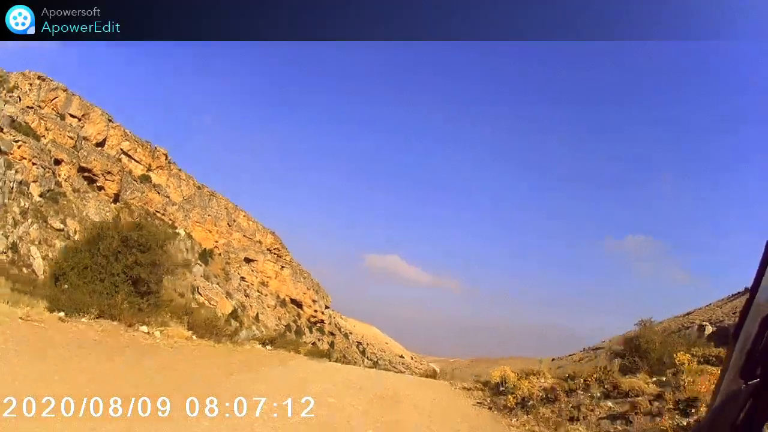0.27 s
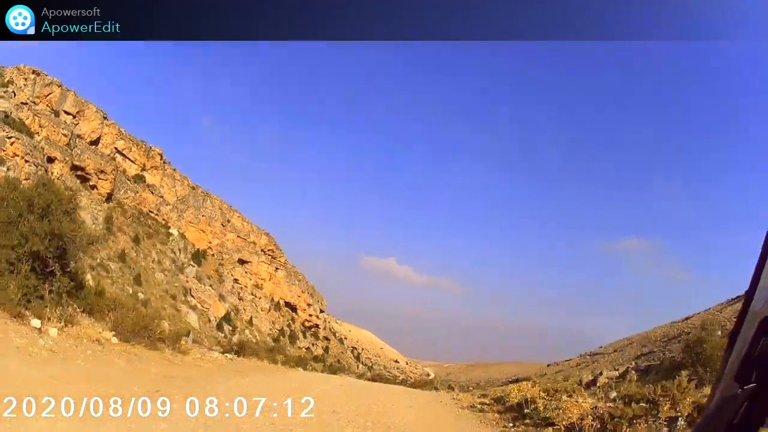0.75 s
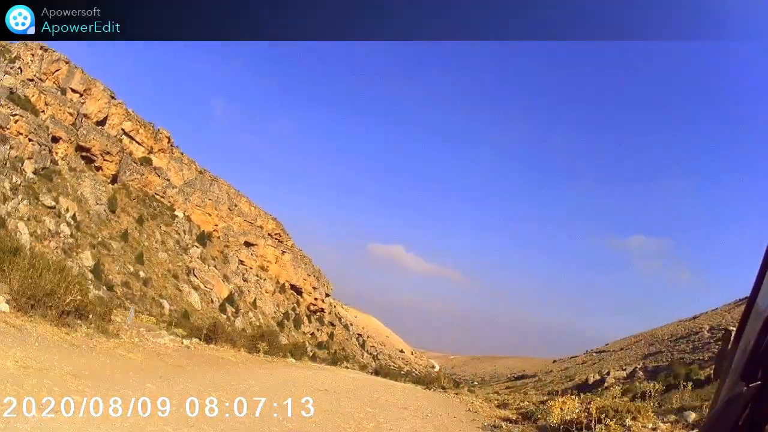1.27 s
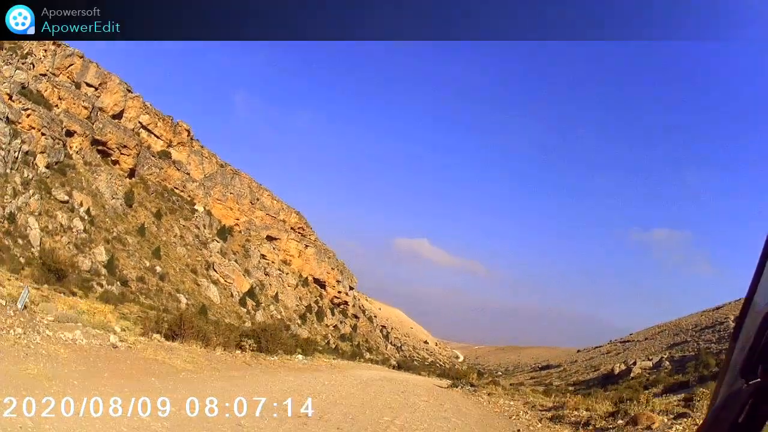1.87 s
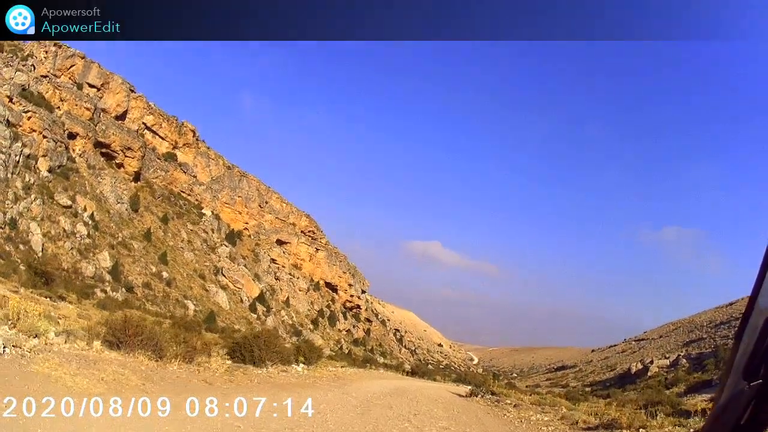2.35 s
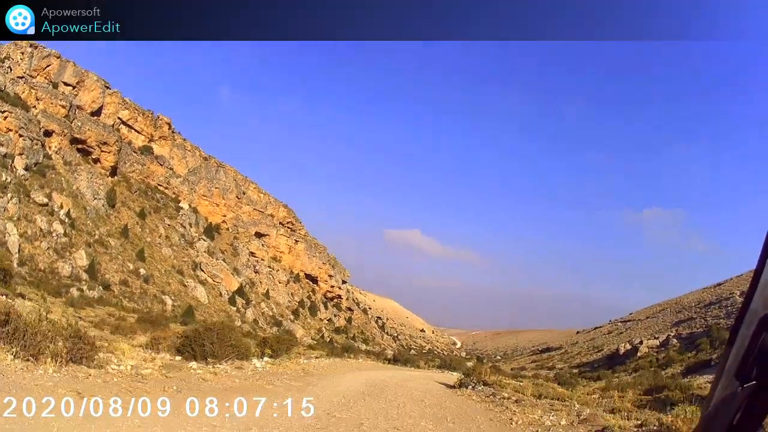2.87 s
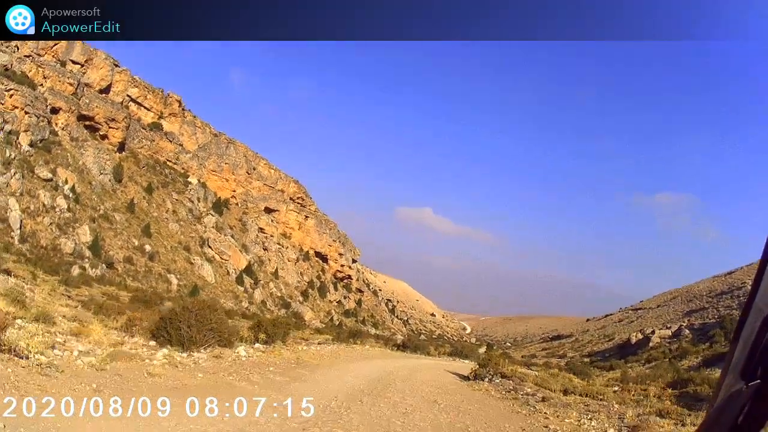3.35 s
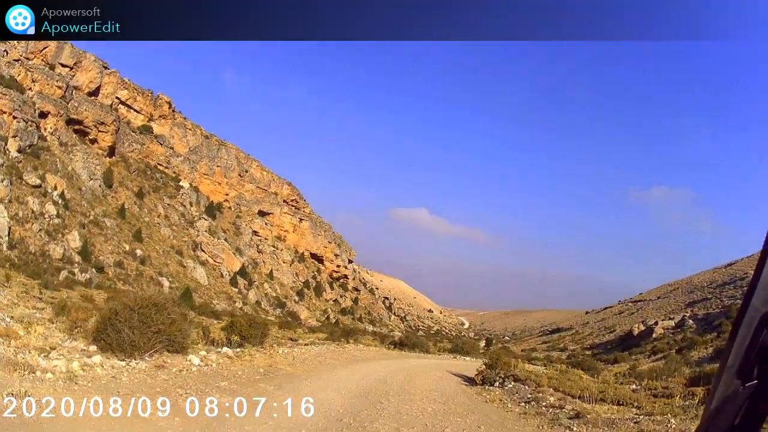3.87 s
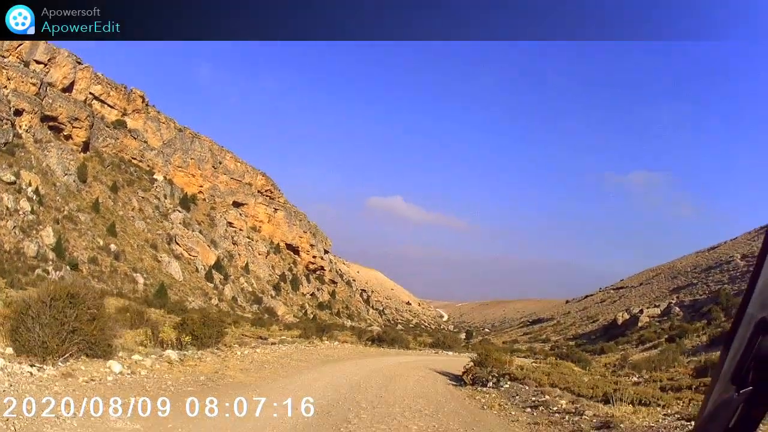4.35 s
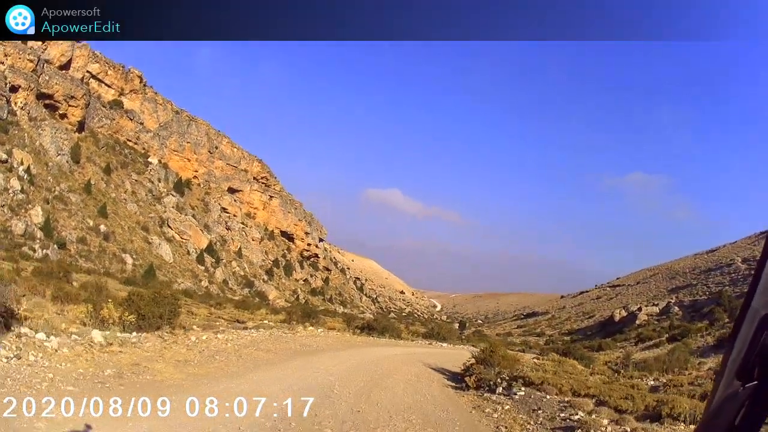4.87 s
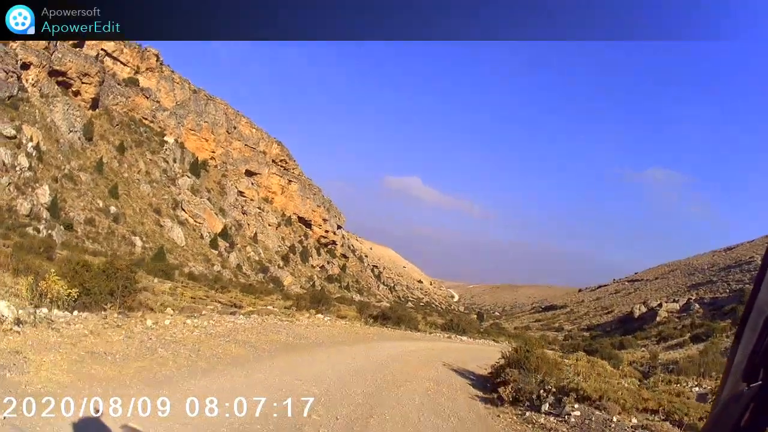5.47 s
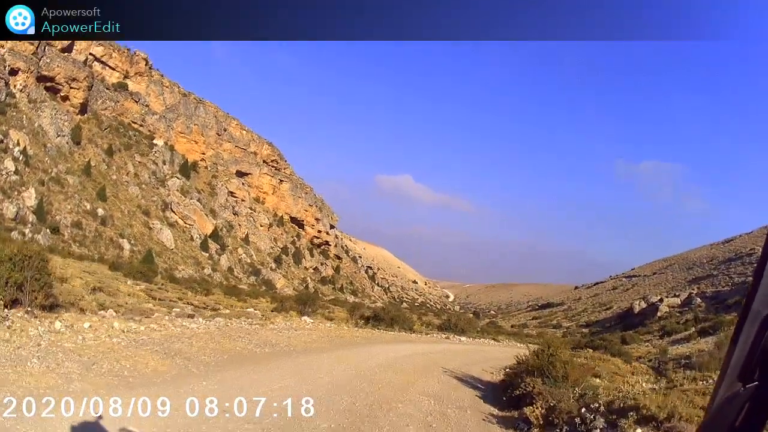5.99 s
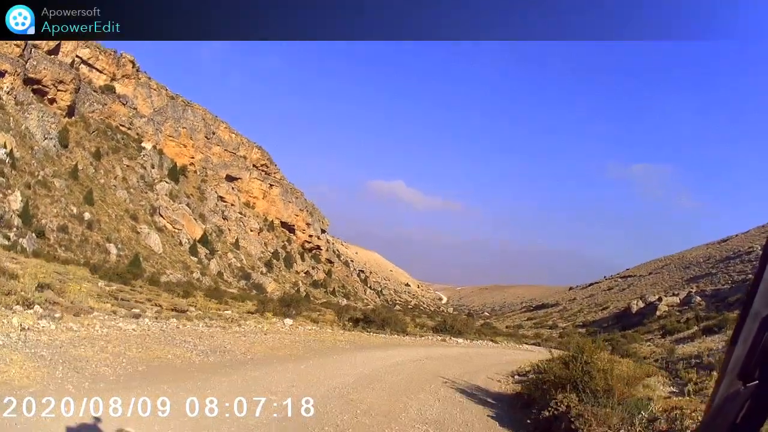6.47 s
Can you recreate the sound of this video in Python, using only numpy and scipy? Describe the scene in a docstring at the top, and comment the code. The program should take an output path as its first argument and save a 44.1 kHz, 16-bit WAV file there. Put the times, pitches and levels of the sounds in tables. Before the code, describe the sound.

Outdoors, close on a moving motorcycle: dense, dry crackling of gravel under the tyres, with bright stone snaps through a resonant plastic-like case. Beneath it, low lopsided exhaust pulses gently slow. Hard knocks come around one and one and a half seconds, then steadier crunching, then a burst of hollow clacks and rattling past five seconds, with more rock knocks to the end. Treble is narrow and slightly muffled.

```python
"""The exhaust of a twin-cylinder motorcycle throbs in uneven pairs of decaying booms as it rolls down a gravel
track at low revs, heard from a small camera on the bike. Gear mesh adds a faint modulated whine. The tyres
rush as shaped noise and crush loose stones, whose impulses tick sharply through the resonant camera housing.
Filtered blows make rocks knock, ringing modes make a loose part clack, and wind is gusting low-passed noise."""
import sys
import numpy as np
from scipy import signal
from scipy.fft import rfft, irfft
from scipy.io import wavfile
from scipy.ndimage import uniform_filter1d

SR = 44100
rng = np.random.default_rng(int(sys.argv[2]) if len(sys.argv) > 2 else 0)


def store_wav(level_fs):
    """Save 16-bit WAV to argv[1]."""
    pcm = np.round(np.clip(np.atleast_2d(level_fs), -1, 1) * 32767)
    wavfile.write(sys.argv[1], SR, pcm.T.astype(np.int16))


N = 296352   # length in samples


def from_db(db):
    """Logarithmic level: decibels become an amplitude ratio."""
    return 10 ** (np.asarray(db) / 20)


def rms_one(x):
    """Normalisation: scale to a root-mean-square of 1."""
    return x / np.sqrt(np.mean(x ** 2) + 1e-20)


def in_time(rows):
    """Linear interpolation: a curve of (s, value) rows at every sample."""
    return np.interp(np.arange(N) / SR, *np.transpose(rows))


def swells(rows):
    """Superposition of flat-topped, round-shouldered swells from (middle s, length s, height) rows."""
    t = np.arange(0, N, 20) / SR
    shape = np.zeros(len(t))
    for middle, length, height in rows:
        shape += height * np.exp(-(2 * (t - middle) / length) ** 4)
    return in_time(np.column_stack([t, shape]))


def drift(rate):
    """Low-passed randomness: smooth chance of rms 1 that changes about rate times a second."""
    hz = np.fft.rfftfreq(N, 1 / SR)
    spectrum = rfft(rng.standard_normal(N)) / (1 + (hz / rate) ** 2) ** 2
    return rms_one(irfft(spectrum, N))


def noise(colour):
    """Spectral shaping: noise of rms 1 that follows (Hz, dB) points."""
    hz, level_db = np.transpose(colour)
    bins_hz = np.fft.rfftfreq(N, 1 / SR) + 1   # keeps the logarithm finite
    gain = from_db(np.interp(np.log(bins_hz), np.log(hz), level_db))
    return rms_one(irfft(rfft(rng.standard_normal(N)) * gain, N))


def soften(x, hz, order=2):
    """Low-pass filtering: the treble falls away above the corner."""
    return signal.sosfilt(signal.butter(order, min(hz, .45 * SR), fs=SR, output="sos"), x + 1e-18)


def thud(clicks, top_hz, bottom_hz=300):
    """Band-pass filtering: the dull body of a blow, without deep bass."""
    band = signal.butter(2, [bottom_hz, top_hz], "band", fs=SR, output="sos")
    return signal.sosfilt(band, clicks + 1e-18)


def resonate(x, hz, width_hz):
    """Damped resonance: a two-pole peak with gain 1 on top."""
    r = np.exp(-np.pi * width_hz / SR)
    zeros = np.array([1, 0, -1]) * (1 - r * r) / 2
    return signal.lfilter(zeros, [1, -2 * r * np.cos(2 * np.pi * hz / SR), r * r], x + 1e-18)


def ring(clicks, hz, t60):
    """Impulse response of a mode: a unit click starts a sine that loses 60 dB in t60 seconds."""
    r = from_db(-60 / (t60 * SR))
    w = 2 * np.pi * hz / SR
    return signal.lfilter([0, np.sin(w)], [1, -2 * r * np.cos(w), r * r], clicks + 1e-18)


def clicks_at(times, sizes):
    """Idealised impact: one single-sample impulse of the given size at each time."""
    out = np.zeros(N)
    out[np.clip(np.round(times * SR).astype(int), 0, N - 1)] = sizes
    return out


def crumble(clicks, share, decay_s):
    """Decaying scatter: each click trails a brief, dying burst of noise."""
    power = signal.lfilter([1], [1, -np.exp(-2 / (decay_s * SR))], clicks ** 2 + 1e-18)
    return clicks + share * np.sqrt(power) * rng.standard_normal(len(clicks))


# The two cylinders' exhaust beats. Each row: place in the cycle from 0 to 1, boom pitch in Hz at BOOM_CPS,
# rise time in seconds, peak level in dB before the engine's changing level is added.
BEATS = [(.551, 86, .0086, -24.2), (.797, 97, .0145, -23.9)]
BOOM_CPS = 12.54   # engine cycles per s at which the booms have their listed pitch


def exhaust(speed, cycles, level_db, follows=0.83, overtone=1.555, overtone_db=-21):
    """Pulse excitation: two uneven beats a cycle swell and die as booms, each with a weak overtone."""
    t = np.arange(int(.07 * SR)) / SR
    out = np.zeros(N + SR)
    for place, hz, swell_s, peak_db in BEATS:
        for i in np.flatnonzero(np.diff(np.floor(cycles - place))):
            swell = (t / swell_s * np.exp(1 - t / swell_s)) ** 2.5
            swell *= from_db(rng.standard_normal())   # beats vary by about 1 dB
            phase = 2 * np.pi * hz * (speed[i] / BOOM_CPS) ** follows * t
            boom = -np.sin(phase) + from_db(overtone_db) * np.sin(overtone * phase)
            out[i:i + len(t)] += from_db(peak_db + level_db[i]) * swell * boom
    return out[:N]


def gears(speed, cycles, teeth=92, blur_hz=85, whine_db=-42, slowing_db=55, ripple=0.0842, load_db=8):
    """Modulated mesh tone: it arches up as firings speed the crank, bites at each and fades with the revs."""
    arch = np.cos(2 * np.pi * (cycles - .74))
    load = sum(np.cos(np.pi * (cycles - place)) ** 24 for place, *_ in BEATS)
    phase = 2 * np.pi * teeth * np.cumsum(speed * (1 + ripple * arch)) / SR   # teeth met per cycle
    level_db = whine_db + load_db * load + slowing_db * (speed / speed[0] - 1)
    return from_db(level_db) * np.sin(phase + drift(blur_hz))


# Engine speed. Each row: time in seconds, speed in four-stroke cycles per second.
ENGINE_SPEED = [(0.0, 12.613), (0.84, 13.079), (1.12, 11.932), (1.26, 12.521), (1.96, 11.879),
                (2.24, 10.737), (2.38, 11.9), (2.66, 10.489), (2.8, 12.267), (3.08, 10.409), (3.64, 11.363),
                (3.78, 10.33), (3.92, 11.152), (4.62, 9.371), (4.76, 10.739), (5.04, 10.251),
                (5.18, 10.522), (6.02, 9.472), (6.16, 10.479), (6.72, 9.3)]
EXHAUST_DB, EXHAUST_DB_PER_CPS = -0.5, 0.77   # level at mean speed, rise for each cycle per s
SURGE_DB_PER_CPS, SURGE_S = 0.5, 0.51   # further rise above the running mean speed, length of that mean


def engine():
    """Common drive: the revs set the pace and strength of the beats and the pitch of the gears."""
    speed = in_time(ENGINE_SPEED)
    cycles = np.cumsum(speed) / SR
    surge = speed - uniform_filter1d(speed, int(SURGE_S * SR))
    level_db = EXHAUST_DB + EXHAUST_DB_PER_CPS * (speed - speed.mean()) + SURGE_DB_PER_CPS * surge
    return exhaust(speed, cycles, level_db) + gears(speed, cycles)


# Rush of the tyres on packed dirt. Each row: time in seconds, level in dB before trim and cover.
RUSH_LEVEL = [(0.0, -32), (0.7, -30.5), (1.3, -31.5), (1.7, -32), (2.2, -34), (3.7, -33.5), (4.8, -34),
              (5.4, -31.5), (6.0, -33.5), (6.72, -35)]
# Spectrum of the rush. Each row: frequency in Hz, relative density in dB per Hz.
RUSH_SPECTRUM = [(30, -6.5), (60, 0), (120, 2), (190, -1), (290, -1.5), (400, -4), (520, -3), (800, -7.5),
                 (1150, -8), (1500, -10.5), (2000, -11.5), (2500, -16.5), (3200, -21.5), (4500, -23),
                 (7000, -34.5)]


def tyre_rush(cover_db, follows=0.13, trim_db=-0.25, lumpy_db=1.78, lump_rate=50):
    """Broadband friction: dull, lumpy noise of rubber on dirt, softer on bare ground."""
    level_db = in_time(RUSH_LEVEL) + follows * cover_db + trim_db
    return from_db(level_db + lumpy_db * drift(lump_rate)) * noise(RUSH_SPECTRUM)


# Ruts that the tyres scuff through. Each row: middle in seconds, length in seconds, level in dB.
RUT_SCUFFS = [(1.559, 0.029, -24), (1.649, 0.079, -31), (5.457, 0.035, -30.5), (6.014, 0.074, -38.5)]
# Spectrum of a scuff. Each row: frequency in Hz, relative density in dB per Hz.
RUT_SPECTRUM = [(120, -15), (300, -10), (500, 6.5), (1000, -12), (2000, -4.5), (5000, -16.5)]


def ruts():
    """Gated friction noise: each rut gives a brief, hollow scuff."""
    return swells([(middle, length, from_db(db)) for middle, length, db in RUT_SCUFFS]) * noise(RUT_SPECTRUM)


# Peaks and dips of the camera housing. Each row: frequency in Hz, nominal width in Hz, gain in dB.
HOUSING_BANDS = [(500, 450, -6), (1480, 1660, 4), (2060, 120, 3), (3107, 235, -9), (3790, 970, 8),
                 (4677, 600, 8), (5640, 108, -14), (5990, 950, 5), (8150, 1500, 5.5)]


def housing(x):
    """Structural resonance: the camera's case lifts some bands of a stone's tick and swallows others."""
    for hz, width_hz, gain_db in HOUSING_BANDS:
        gain = from_db(gain_db)
        x = x + (gain - 1) * resonate(x, hz, width_hz / np.sqrt(gain))
    return x


SPLIT_S = .0003   # typical spacing of the three cracks of one stone


def fracture(clicks):
    """Brittle fracture: each stone shares its energy at random among three quick cracks."""
    at = np.flatnonzero(clicks)
    shares = rng.standard_normal((len(at), 3))
    shares /= np.linalg.norm(shares, axis=1, keepdims=True)
    delays = SPLIT_S * np.array([-1, 0, 1]) * rng.uniform(.3, 1.7, (len(at), 3))
    return clicks_at(at[:, None] / SR + delays, clicks[at, None] * shares)


# Crunch of the loose gravel. Each row: time in seconds, level in dB before cover and grain level are added.
CRUNCH_LEVEL = [(0, -27.5), (1.2, -26.5), (2.2, -29.5), (3, -28.5), (4, -28.5), (4.9, -29), (5.35, -26),
                (5.65, -28), (6.3, -29.5), (6.72, -30.5)]


def gravel(cover_db, tread_per_s=150, tread_range_db=14, grit_per_s=70, grit_db=-15, grit_range_db=18,
           crowding=.36, grain_db=-2.0, dull_hz=2200, dull_db=-3):
    """Random impulse trains: the tread cracks stones at an uneven pace, finer grit crackles in between."""
    crunch_db = in_time(CRUNCH_LEVEL) + cover_db
    crowd = from_db(2 * crowding * (crunch_db - crunch_db.mean()))   # deeper gravel gives more ticks
    turns = np.cumsum(rng.gamma(4, .25, size=6000))   # uneven steps with mean 1
    bites = np.diff(np.searchsorted(turns, np.cumsum(tread_per_s * crowd) / SR), prepend=0)
    grit = rng.random(N) < grit_per_s * crowd / SR
    sizes = bites * from_db(-tread_range_db * rng.random(N))
    sizes = sizes + grit * from_db(grit_db - grit_range_db * rng.random(N))
    cracks = fracture(sizes / np.sqrt(crowd))
    body = from_db(dull_db) * thud(cracks * rng.uniform(-1.5, 1, N), dull_hz)   # a random share per crack
    snaps = crumble(cracks, share=.04, decay_s=.0007)
    return from_db(crunch_db + grain_db) * rms_one(soften(housing(snaps + body), 7750))


# Bigger stones that crack one by one. Each row: time in seconds, level in dB before the snap gain.
BIG_STONES = [(0.023, -15), (0.06, -20.0), (0.077, -17.5), (0.089, -21.5), (0.126, -23), (0.155, -19.5),
              (0.194, -16), (0.2, -13), (0.233, -21), (0.273, -18.5), (0.278, -18), (0.332, -22),
              (0.347, -21), (0.404, -15.5), (0.412, -15.5), (0.469, -14), (0.49, -15.0), (0.506, -15.5),
              (0.572, -21), (0.618, -16.5), (0.626, -18), (0.643, -16.5), (0.661, -18.5), (0.696, -22),
              (0.701, -16), (0.715, -19.0), (0.722, -16), (0.8, -22), (0.841, -20.5), (0.867, -15.5),
              (0.895, -20.0), (0.925, -21), (0.939, -15.5), (0.99, -16.5), (1.103, -11.5), (1.112, -17),
              (1.148, -16.5), (1.172, -14), (1.198, -15), (1.296, -15.5), (1.346, -20.0), (1.409, -16.5),
              (1.416, -20), (1.557, -17.0), (1.571, -17.0), (1.587, -15.5), (1.637, -14.5), (1.669, -16),
              (1.935, -14.5), (2.026, -18.5), (2.069, -23), (2.204, -22), (2.307, -17), (2.315, -21),
              (2.334, -19.5), (2.377, -21), (2.393, -22), (2.42, -23), (2.441, -18.5), (2.534, -19.5),
              (2.653, -22), (2.695, -20), (2.704, -22), (2.72, -18.5), (2.731, -22), (2.834, -20.5),
              (2.848, -22), (2.881, -18.5), (2.994, -19), (3.017, -22), (3.052, -23), (3.18, -19.0),
              (3.19, -13.5), (3.315, -24), (3.344, -18.0), (3.401, -22), (3.431, -22), (3.504, -18),
              (3.573, -14), (3.598, -17), (3.662, -20), (3.69, -19), (3.702, -18.5), (3.766, -21.5),
              (3.794, -21), (3.826, -14), (3.899, -17), (3.938, -18), (3.943, -17.5), (3.972, -22),
              (4.045, -19.5), (4.1, -26), (4.188, -18), (4.249, -21), (4.274, -21), (4.382, -15.5),
              (4.398, -19), (4.418, -18), (4.492, -17), (4.501, -15.5), (4.542, -17.0), (4.551, -23),
              (4.683, -18), (4.738, -19), (4.812, -18), (4.903, -21), (5.003, -21), (5.044, -20),
              (5.055, -23), (5.117, -19.5), (5.168, -16.5), (5.25, -19.5), (5.26, -14), (5.297, -17),
              (5.316, -17), (5.336, -21), (5.384, -19.5), (5.416, -16.5), (5.443, -17), (5.458, -18),
              (5.465, -15), (5.712, -25), (5.716, -24), (5.782, -15), (5.853, -20), (5.879, -20.0),
              (5.905, -19.5), (5.923, -16), (5.977, -14), (6.034, -20.0), (6.187, -20.5), (6.253, -22),
              (6.29, -20.5), (6.322, -19), (6.353, -22), (6.392, -25), (6.444, -16.0), (6.519, -19.5),
              (6.533, -17), (6.566, -22.5)]
# Lesser snaps at random: rate per s before cover, level in dB before the snap gain, spread in dB.
PEBBLES_PER_S, PEBBLE_DB, PEBBLE_SPREAD_DB = 6, -26, 0.5


def stones(cover_db, snap_db=17.0, dull_hz=2000, dull_db=-5):
    """Impact radiation: bigger stones snap under the tread, with lesser ones at random where gravel lies."""
    times, level_db = np.transpose(BIG_STONES)
    falls = rng.random(N) < PEBBLES_PER_S * from_db(2 * cover_db) / SR
    pebbles = falls * from_db(PEBBLE_DB + PEBBLE_SPREAD_DB * rng.standard_normal(N))
    cracks = fracture(from_db(snap_db) * (clicks_at(times, from_db(level_db)) + pebbles))
    snaps = crumble(cracks, share=.04, decay_s=.001)
    body = from_db(dull_db) * thud(cracks * rng.uniform(-0.6, 1, N), dull_hz)   # a random share per crack
    return housing(snaps + body)


# Deeper heaps that the tyres plough through. Each row: middle in seconds, length in seconds, rise in dB.
DEEP_HEAPS = [(2.705, .05, 5), (2.312, .045, 6), (2.4, .07, 5), (3.82, .04, 4), (4.4, .06, 4),
              (4.97, .05, 3), (5.335, .06, 2), (6.32, .07, 4)]
# Bare patches, where the crunch falls away. Each row: middle in seconds, length in seconds, drop in dB.
BARE_GROUND = [(1.24, 0.038, 10), (1.48, 0.104, 11), (1.76, 0.119, 9), (2.14, 0.085, 10), (2.48, 0.073, 10),
               (2.6, 0.115, 7), (2.94, 0.077, 11), (3.26, 0.118, 6), (3.54, 0.031, 12), (3.72, .05, 7),
               (3.86, .035, 10), (4.005, .035, 7), (4.14, 0.054, 10), (4.33, 0.032, 13), (4.61, 0.083, 17),
               (5.09, 0.037, 6), (5.21, .05, 8), (5.63, .14, 8), (5.815, 0.04, 10), (6.22, 0.042, 7)]
CLUMP_DB, CLUMP_RATE = 1.39, 24   # small random heaps: swing in dB, changes per s
CLIMB_S, CLIMB_LEAD_S, CLIMB_DB = .022, .011, 6   # pause as a tyre rides up a big stone: length, lead, drop
CLEAR_RUN_S = .035   # the pause only comes after this long without another big stone


def gravel_cover():
    """Varying source density: how thickly gravel lies under the tyres, in dB."""
    times = np.array(BIG_STONES)[:, 0]
    clear = times[np.diff(times, prepend=0) > CLEAR_RUN_S]
    climbs = swells([(s - CLIMB_LEAD_S, CLIMB_S, CLIMB_DB) for s in clear])
    return CLUMP_DB * drift(CLUMP_RATE) + swells(DEEP_HEAPS) - np.maximum(swells(BARE_GROUND), climbs)


# Knocks of the wheels against bedded rocks. Each row: time in seconds, level in dB before the knock gain
# and filtering, upper band edge in Hz.
ROCK_KNOCKS = [(1.103, -6, 2703), (1.107, -4, 2540), (1.1452, -4, 2396), (1.548, -2, 1410),
               (1.555, -3, 1097), (1.571, -8, 1900), (1.654, -10, 2400), (1.666, -8, 2002),
               (5.457, -7, 2190), (5.465, -6, 2400), (5.71, -5.5, 2992), (5.782, -8, 2690),
               (6.001, -2, 1198), (6.047, -5, 2292), (6.332, -2.5, 2725)]


def rocks(knock_db=6, lowest_hz=280):
    """Band-limited impact: a short, rattling crack through wheel and frame; blunter rocks sound duller."""
    out, blow = np.zeros(N), signal.unit_impulse(SR // 20)
    for s, level_db, top_hz in ROCK_KNOCKS:
        i = int(s * SR)
        crack = soften(crumble(blow, share=.25, decay_s=.006), top_hz)
        out[i:i + len(blow)] += from_db(level_db + knock_db) * thud(crack, top_hz, lowest_hz)
    return out


# Clacks of a loose part, each landing differently. Each row: time in seconds, level in dB before the knock
# gain, pitch in Hz, brightness in dB per octave above the pitch.
PART_CLACKS = [(5.317, -16, 1544, 15), (5.368, -6, 1570, -7), (5.377, -13, 1679, 9),
               (5.419, -8.5, 1550, -10), (5.443, -10, 1420, -6), (5.5, -11, 1660, -5), (5.559, -8, 1533, 8),
               (5.563, -13.5, 1602, 1), (5.645, -18.5, 1580, 14), (5.71, -10, 1660, 11),
               (5.753, -18, 1593, 2), (5.889, -10, 1602, -3)]
# Modes of the part. Each row: multiple of the pitch, relative level in dB, 60 dB decay time in seconds.
PART_MODES = [(.48, -21, .016), (.82, -17, .009), (1, 0, .022), (1.09, -8, .014), (1.34, -11, .009),
              (1.61, -7, .01), (2.5, -16, .01)]
# Light rattling of the part. Each row: middle in seconds, length in seconds, peak rate in touches per second.
PART_RATTLE = [(5.42, 0.41, 60), (5.75, 0.24, 15)]
RATTLE_DB, RATTLE_SPREAD_DB = -27, 2.5


def loose_part(knock_db=-7.5):
    """Modal excitation: each clack strikes the modes and chatters briefly; light touches fall in between."""
    touched = rng.random(N) < swells(PART_RATTLE) / SR
    touches = touched * from_db(RATTLE_DB + RATTLE_SPREAD_DB * rng.standard_normal(N))
    usual_hz = np.median(np.array(PART_CLACKS)[:, 2])
    out = sum(from_db(mode_db) * ring(touches, usual_hz * ratio, t60) for ratio, mode_db, t60 in PART_MODES)
    blow = signal.unit_impulse(SR // 20)
    for s, clack_db, hz, bright_db in PART_CLACKS:
        i = int(s * SR)
        for ratio, mode_db, t60 in PART_MODES:
            chatter = crumble(blow, share=.05, decay_s=.004)
            level_db = clack_db + knock_db + mode_db + bright_db * np.log2(max(ratio, 1))
            out[i:i + len(blow)] += from_db(level_db) * ring(chatter, hz * ratio, t60)
    return out


# Spectrum of wind on the microphone. Each row: frequency in Hz, relative density in dB per Hz.
WIND_SPECTRUM = [(15, -14), (30, -13), (50, 1), (70, -2), (100, 0), (150, -5), (300, -23.5), (600, -44.5)]


def wind(level_db=-43.8, gust_db=3.6, gust_rate=9):
    """Turbulent pressure: low buffeting of the passing air, with random gusts."""
    return from_db(level_db + gust_db * drift(gust_rate)) * noise(WIND_SPECTRUM)


def scene():
    """Linear superposition: engine, track and air at one microphone in the open."""
    cover_db = gravel_cover()
    track = tyre_rush(cover_db) + ruts() + gravel(cover_db) + stones(cover_db) + rocks() + loose_part()
    return (engine() + track + wind())[None, :]


PASS_BAND_HZ, CUTOFF_HZ = 7000, 15800   # corner of the main band, edge above which almost nothing is left
FADE_S = .012   # closing fade


def record(dry, top=2.5, leak_db=-42, flicker_db=11, flicker_rate=110, roll_off_hz=9800):
    """Band limiting and saturation: a narrow band, rounded peaks and a faint treble that flickers above."""
    narrow = signal.fftconvolve(dry, signal.firwin(141, PASS_BAND_HZ, fs=SR)[None, :], mode="same")
    flicker = flicker_db * np.minimum(drift(flicker_rate), 2.5)
    leak = from_db(leak_db + flicker) * soften(dry, 9500)
    rounded = soften(top * np.tanh((narrow + leak) / top), roll_off_hz)
    fade = np.minimum(np.arange(N)[::-1] / (FADE_S * SR), 1)
    return signal.sosfilt(signal.cheby2(12, 70, CUTOFF_HZ, fs=SR, output="sos"), rounded * fade)


dry = scene()
out = record(dry)
store_wav(out)
```